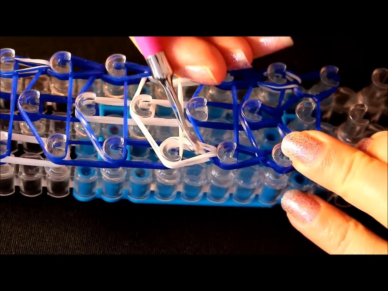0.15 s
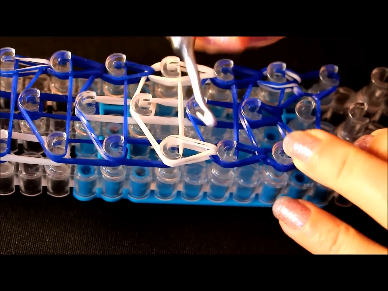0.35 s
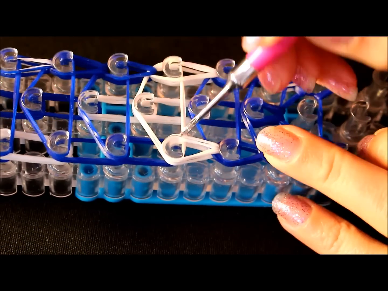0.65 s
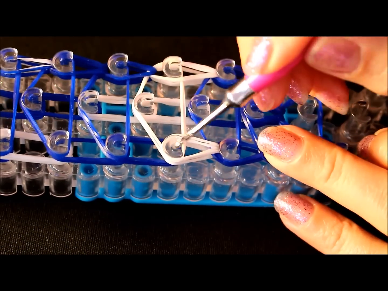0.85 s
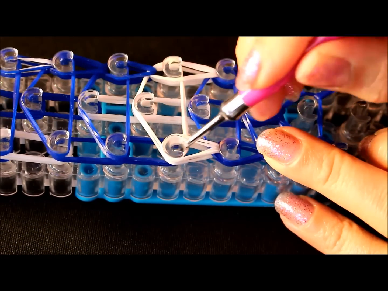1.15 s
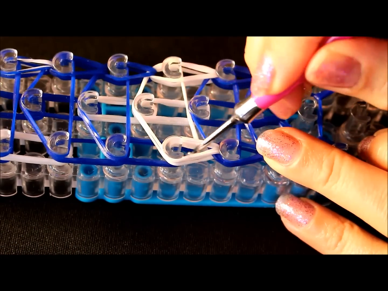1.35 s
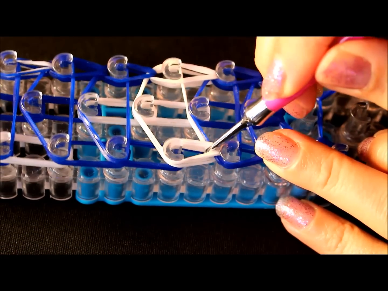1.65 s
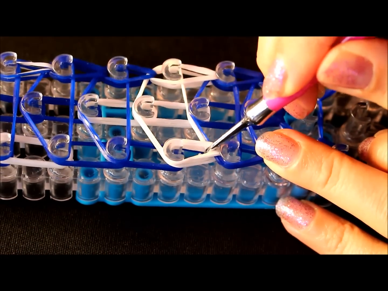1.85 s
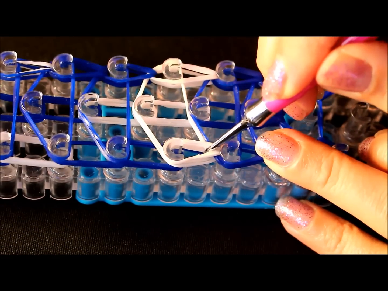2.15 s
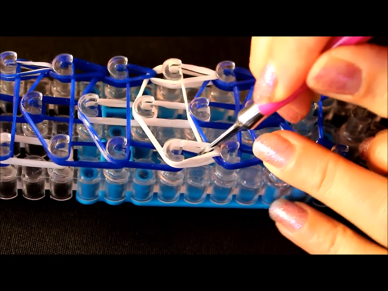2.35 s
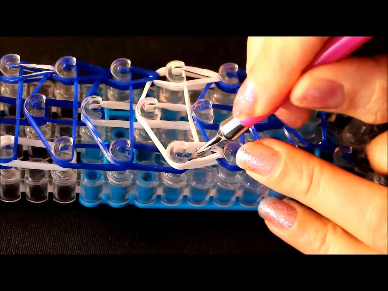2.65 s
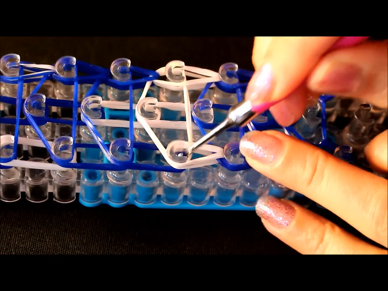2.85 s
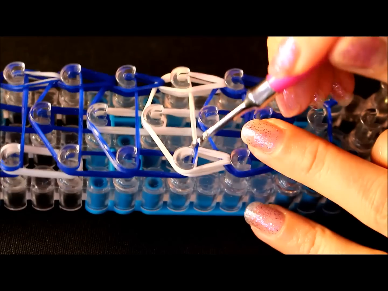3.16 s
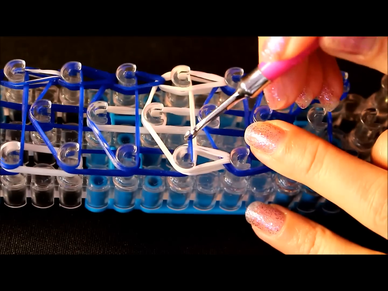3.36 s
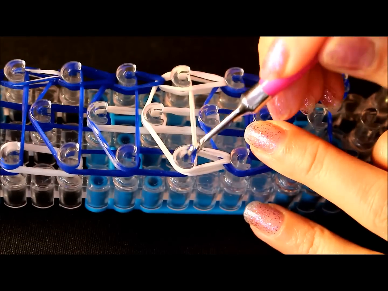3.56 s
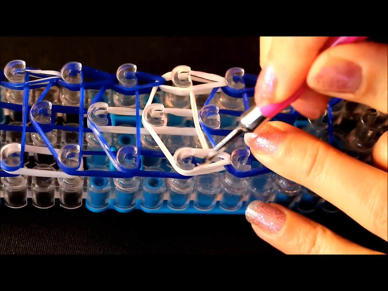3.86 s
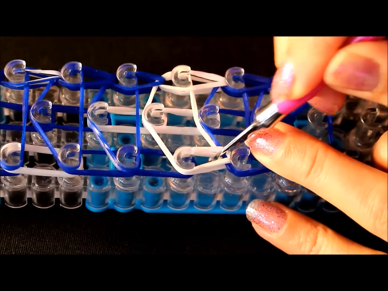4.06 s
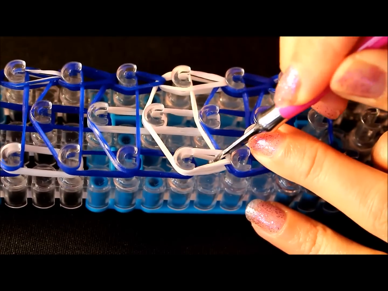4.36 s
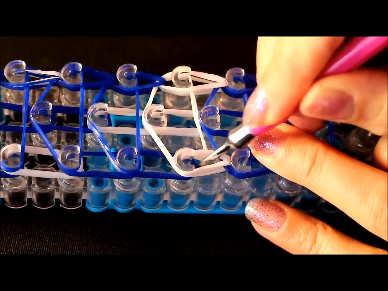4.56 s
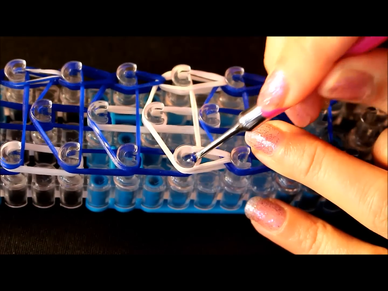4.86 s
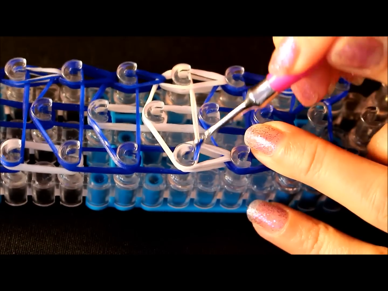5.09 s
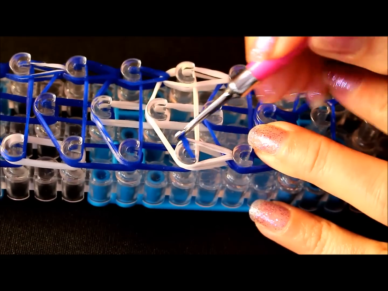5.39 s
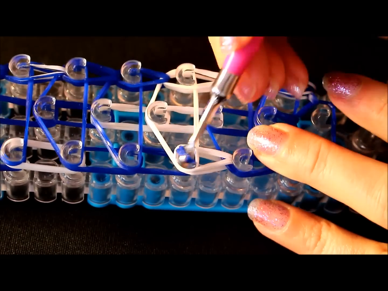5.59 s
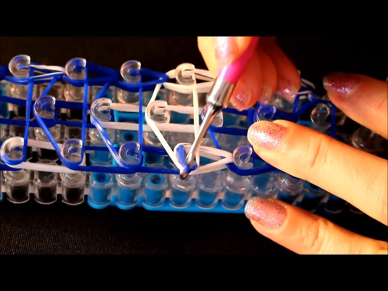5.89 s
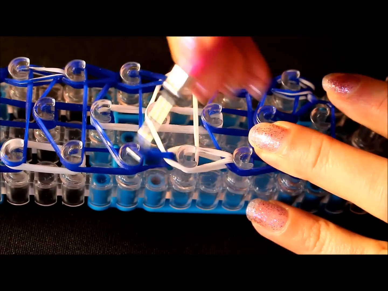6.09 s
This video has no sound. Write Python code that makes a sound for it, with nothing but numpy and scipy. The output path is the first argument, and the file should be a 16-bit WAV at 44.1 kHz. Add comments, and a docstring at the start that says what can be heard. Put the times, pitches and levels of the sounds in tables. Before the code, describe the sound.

Close, irregular taps of a crochet hook on plastic pegs, rubber bands snapping and twanging, ending in a quick run of ticks.

```python
"""Rubber bands on a plastic loom

Close by, a metal crochet hook works rubber bands over pegs; its clicks ring the hollow frame.
Three bands snap loudly, the loom rocks on the table with soft thuds, and rubber twangs and rubs.
At the end a stretched band slips over a peg in a quick run of ticks. A small room hums and hisses."""
import sys
import numpy as np
from scipy import signal
from scipy.fft import rfft, irfft
from scipy.io import wavfile

SR = 44100
rng = np.random.default_rng(int(sys.argv[2]) if len(sys.argv) > 2 else 0)


def int16_out(signal):
    """Quantize to a 16-bit WAV file."""
    q = np.round(np.clip(np.atleast_2d(signal).T, -1, 1) * 32767)
    wavfile.write(sys.argv[1], SR, q.astype(np.int16))


N = 274743


def undb(db):
    """Decibels to gain."""
    return 10 ** (np.asarray(db) / 20)


def seconds(length_s):
    """Time axis."""
    return np.arange(int(length_s * SR)) / SR


def fade(t, t60_s):
    """Free decay, 60 dB down at t60_s."""
    return np.exp(-np.log(1000) * t / t60_s)


def band(x, low_hz, high_hz):
    """Causal band-pass."""
    return signal.sosfilt(signal.butter(2, [low_hz, high_hz], "band", fs=SR, output="sos"), x)


def on_log_axis(hz, points):
    """Interpolate (freq_hz, value) points over log frequency."""
    point_hz, value = np.transpose(points)
    return np.interp(np.log(hz + 1), np.log(point_hz), value)


def add(track, start_s, sound):
    """Mix a sound into a track."""
    i = max(int(start_s * SR), 0)
    track[..., i:i + sound.shape[-1]] += sound[..., :max(N - i, 0)]


# Noise spectrum: freq_hz, relative_density_db
AIR_SPECTRUM = [(20, -7), (35, -5), (70, -1.5), (130, 4.5), (250, -1.5), (450, -4), (800, -7), (1600, -9.5),
                (3500, -11), (6000, -14.5), (10000, -19), (15000, -25)]
# Noise width: freq_hz, left_right_correlation
AIR_CORRELATION = [(60, 0.35), (110, 0.26), (200, -0.11), (400, -0.45), (1200, -0.47), (2400, -0.35),
                   (4400, -0.16), (14000, -0.045)]
# Mains hum: freq_hz, rms_db
HUM_PARTIALS = [(49.5, -68.5), (99, -66), (199, -69)]

def air(mid_rms_db=-58, low_cut_hz=58):
    """Steady room noise and microphone hiss, narrow in the bass and wide in the mids, with mains hum."""
    f = np.arange(N // 2 + 1) * SR / N
    correlation = on_log_axis(f, AIR_CORRELATION)
    low_cut = 1 / np.sqrt(1 + (low_cut_hz / (f + 1)) ** 5)
    spectra = rfft(rng.standard_normal((2, N))) * undb(on_log_axis(f, AIR_SPECTRUM)) * low_cut
    mid = irfft(spectra[0], N)
    side = irfft(spectra[1] * np.sqrt((1 - correlation) / (1 + correlation)), N)
    t = np.arange(N) / SR
    hum = sum(np.sqrt(2) * undb(db) * np.sin(2 * np.pi * (hz * t + rng.random()))
              for hz, db in HUM_PARTIALS)
    return np.array([mid + side, mid - side]) * undb(mid_rms_db) / mid.std() + hum


def room(x, low_t60_s=0.46, mid_t60_s=0.23, high_t60_s=0.3, early_t60_s=0.045, early_db=4, gap_s=0.002):
    """Dense stereo reflections: a quick early cluster, then a tail that darkens."""
    t = seconds(0.6)
    wide = rng.standard_normal((2, len(t)))
    narrow = wide + 0.86 * rng.standard_normal(len(t))  # partly shared by closely spaced microphones
    tail = (band(narrow, 68, 1310) * fade(t, low_t60_s)
            - band(narrow, 2300, 4000) * fade(t, mid_t60_s)
            + band(wide, 3700, 15300) * fade(t, high_t60_s))
    early = undb(early_db) * narrow * fade(t, early_t60_s)
    response = (tail + early) * np.clip(t / gap_s - 1, 0, 1)
    response /= np.sqrt(np.mean(np.sum(response ** 2, axis=1)))
    return signal.fftconvolve(x[None], response, axes=1)[:, :N]


# Near reflections: left_delay_s, right_delay_s, gain_db
NEAR_ECHOES = [(.0024, 0.0042, -18), (0.0128, 0.013, -13), (0.0173, 0.016, -20.5)]

def with_echoes(direct):
    """Direct sound plus its echoes off hands, table and nearby things."""
    out = direct.copy()
    for *delays_s, gain_db in NEAR_ECHOES:
        for ear, delay_s in enumerate(delays_s):
            add(out[ear], delay_s, undb(gain_db) * direct[ear])
    return out


def swing(pitch_hz, t60_s, sharp, settle_s, octave_db, rise_s):
    """A dying vibration that starts slightly sharp while the tension lasts."""
    t = seconds(0.4)
    glide_hz = pitch_hz * (1 + sharp * np.exp(-t / settle_s))
    phase = 2 * np.pi * np.cumsum(glide_hz) / SR
    fundamental = np.sin(phase) * fade(t, t60_s)
    octave = undb(octave_db) * np.sin(2 * phase) * fade(t, t60_s / 2)
    return (fundamental + octave) * (1 - np.exp(-t / rise_s))


# Loom rocking: start_s, pitch_hz, level_db
LOOM_THUDS = [(.699, 145, -47), (1.479, 299, -34.5), (1.655, 193, -43), (1.676, 183, -42),
              (1.706, 133, -39), (1.819, 164, -46.5), (2.789, 188, -40), (3.065, 132, -37),
              (4.458, 285, -43), (4.495, 210, -41), (4.549, 130.6, -39), (4.551, 274, -34)]

def thuds(ref_hz=135, ref_t60_s=0.18, damping_exponent=1.3):
    """The loom rocks on the table as a band pulls or lets go; higher thuds die sooner."""
    out = np.zeros(N)
    for start_s, pitch_hz, level_db in LOOM_THUDS:
        t60_s = ref_t60_s * (ref_hz / pitch_hz) ** damping_exponent
        thud = swing(pitch_hz, t60_s, sharp=0.066, settle_s=0.0033, octave_db=-11.5, rise_s=0.0018)
        add(out, start_s, undb(level_db) * thud)
    return out


# Plucked bands: start_s, pitch_hz, level_db
BAND_TWANGS = [(.641, 427, -50), (1.484, 408.5, -41), (2.513, 626, -40), (4.091, 550, -36)]

def twangs():
    """A released band swings briefly at its own pitch."""
    out = np.zeros(N)
    for start_s, pitch_hz, level_db in BAND_TWANGS:
        twang = swing(pitch_hz, t60_s=0.17, sharp=0.05, settle_s=0.0068, octave_db=-22, rise_s=0.0017)
        add(out, start_s, undb(level_db) * twang)
    return out


FRAME, PLATE, PEG, TIP, TICK = PARTS = range(5)  # row order of the per-part tables
# Range per part: low_hz, high_hz
PART_BANDS = [(110, 430), (620, 1800), (1950, 2900), (2900, 4800), (4800, 16000)]
# Response per part: rise_s, clatter_db, clatter_t60_s, room_send_db, left_minus_right_db
PART_RESPONSES = [(0.0029, -2.5, 0.047, -2.5, -0.5), (0.0017, -4.5, 0.055, -4, 3),
                  (.0011, -5.5, 0.044, -13.5, 1.5), (0.0013, -17.5, 0.047, -13.5, 0),
                  (0.0004, -2.5, .013, -10.5, 0)]
# Loom and hook resonances: freq_hz, level_db, t60_s
LOOM_MODES = [(193, -3.5, 0.089), (245, -7, .04), (280, 8, 0.043), (385, -4, 0.035), (630, -9, .03),
              (933, 0, 0.028), (1047, -0.5, 0.025), (1201, -6.5, 0.039), (1354, -0.5, 0.035),
              (1472, 1.5, 0.031), (1741, -4, 0.036), (1990, -14, 0.013), (2293, 4.5, 0.022),
              (2476, -7.5, 0.013), (2724, -6, 0.027), (3120, 0.5, 0.022), (3397, 3.5, 0.016),
              (3560, 1, 0.016), (3700, 1.5, 0.015), (3970, 8.5, 0.013), (4226, 0.5, 0.017),
              (4540, -0.5, 0.016), (4830, -23, 0.0091), (4798, -3, 0.012), (5160, -2, 0.013),
              (5690, 3, 0.013), (6270, -1, 0.014), (7220, -3, 0.015), (11750, -1, 0.01), (13940, 4, 0.0065)]

def ring(part, plate_hz=1000, tip_hz=3700, top_hz=6200, focus_width=0.081, off_focus_db=-13,
         spread_s=0.000906, push_s=0):
    """One struck part, peak 1: its modes over a quick clatter of many weaker ones."""
    t = seconds(0.2)
    low_hz, high_hz = PART_BANDS[part]
    rise_s, clatter_db, clatter_t60_s, *_ = PART_RESPONSES[part]
    modes = np.zeros(len(t))
    for hz, level_db, t60_s in LOOM_MODES:
        if low_hz <= hz < high_hz:
            # The contact point favours modes near plate_hz and tip_hz.
            focus = sum(np.exp(-(np.log(hz / near) / focus_width) ** 2) for near in (plate_hz, tip_hz))
            gain = (undb(off_focus_db) + focus) * undb(level_db)
            detuned_hz = hz * (1 + 0.008 * rng.standard_normal())
            # Phases roughly align once the blow has spread through the part.
            phase = 2 * np.pi * detuned_hz * (t - spread_s) + 0.53 * rng.standard_normal()
            modes += gain * np.sin(phase) * fade(t, t60_s)
    clatter = band(rng.standard_normal(len(t)), low_hz, high_hz) * fade(t, clatter_t60_s)
    ringing = modes / abs(modes).max() + undb(clatter_db) * clatter / abs(clatter).max()
    attack = 1 - np.exp(-(t / (rise_s + push_s)) ** 2)
    contact_lowpass = signal.butter(3, top_hz, fs=SR, output="sos")
    blow = signal.sosfilt(contact_lowpass, ringing * attack)
    return blow / abs(blow).max()


# Rubber and fingers on the loom: start_s, end_s, level_db, softness_db
RUB_STROKES = [(1.09, 1.148, -67.5, 4), (2.258, 2.446, -72.5, 11), (2.848, 3.007, -71, -7),
               (3.01, 3.078, -62.5, 3.5), (3.701, 3.933, -71.5, 4), (4.44, 4.56, -66.5, 6),
               (4.727, 4.8, -67.5, 5.5), (4.853, 4.946, -69.5, -5.5), (5.235, 5.307, -67, -3),
               (5.38, 5.63, -67, 3), (6.131, 6.176, -53, -3)]
# Mix of frame, plate, tip: share_db, db_per_softness_db
RUB_MIX = [(-0.2, 1.0), (-1, -0.22), (0.1, -1.2)]

def rubs(catches_per_s=420, scatter_db=3):
    """Friction: a swell of tiny uneven catches rings the loom; a soft touch favours the frame."""
    parts = np.zeros((len(PARTS), N))
    for start_s, end_s, level_db, softness_db in RUB_STROKES:
        samples = int((end_s - start_s) * SR)
        caught = rng.random(samples) < catches_per_s / SR
        catches = caught * undb(scatter_db * rng.standard_normal(samples))
        catches *= rng.choice([-1, 1], samples) * signal.windows.tukey(samples, 0.6)
        for part, (share_db, by_softness) in zip((FRAME, PLATE, TIP), RUB_MIX):
            rub = signal.fftconvolve(catches, ring(part, focus_width=0.4))
            rub /= np.sqrt(np.sum(rub ** 2) / samples + 1e-18)
            add(parts[part], start_s, undb(level_db + share_db + softness_db * by_softness) * rub)
    return parts


def jerks(step_s, fall_db_per_s, steps, crest_s=6.1553, crest_db=-22):
    """Even jerks, weaker the further from the crest of the peg: rows of start_s, level_db."""
    return [(crest_s + k * step_s, crest_db - fall_db_per_s * abs(k * step_s)) for k in steps]


# Faint single ticks, some just before a loud snap: start_s, level_db
SINGLE_TICKS = [(1.452, -44), (4.542, -36), (5.9326, -39), (6.0204, -29.5)]
# Mix per part: share_db
TICK_MIX = [-18.5, -18, -17, -2, -11]

def ticks_and_slip(grip_t60_s=0.055, plate_hz=920, tip_hz=3750, wander=0.039):
    """Single ticks, then a stick-slip run: each jerk ticks the peg and the gripping rubber damps it."""
    parts = np.zeros((len(PARTS), N))
    climb = jerks(step_s=-0.0185, fall_db_per_s=85, steps=range(1, 4))
    slide = jerks(step_s=0.017, fall_db_per_s=190, steps=range(5))
    for start_s, level_db in SINGLE_TICKS + climb + slide:
        shift = 1 + wander * rng.standard_normal()
        for part, share_db in enumerate(TICK_MIX):
            tick = ring(part, plate_hz * shift, tip_hz * shift, top_hz=5200, off_focus_db=-12)
            grip = fade(np.arange(len(tick)) / SR, grip_t60_s)
            add(parts[part], start_s, undb(level_db + share_db) * tick * grip)
    return parts


def strike(parts_db, tip_hz, mid_peg_plate_hz=1210, mid_peg_tip_hz=3850, **contact):
    """One blow on all parts; off mid-peg, the favoured plate resonance falls as the tip's rises."""
    plate_hz = mid_peg_plate_hz * (mid_peg_tip_hz / tip_hz) ** 2.5
    return np.array([undb(parts_db[part]) * ring(part, plate_hz, tip_hz, **contact) for part in PARTS])


# Hook on pegs: start_s, level_db, softness_db, side_push_db, tip_hz
HOOK_TAPS = [(0.105, -56.5, -17, 4, 3930), (0.1272, -38.5, -9, 7.5, 3300), (0.234, -46.5, 2, 4, 3580),
             (0.315, -48.5, -3.5, 4, 3500), (0.3667, -48.5, -8.5, -6, 3900), (0.6966, -38, 0, -1.5, 3970),
             (0.791, -46.5, -2.5, 0, 4060), (1.0956, -44.5, -7, -3, 3660), (1.4087, -56.5, -17, 1, 3780),
             (1.6758, -45.0, 8, 6, 3600), (1.7, -44.5, 4.5, 4, 3620), (1.8193, -55.5, 11, 12, 3560),
             (2.292, -56.5, 12.5, -1, 3570), (2.37, -56.0, 14, 9, 3600), (2.513, -46.5, -2, -5, 3480),
             (2.523, -35.5, -2.5, -0.5, 3600), (2.587, -35, 2.5, 3, 4030), (2.615, -37, 1.5, -3, 3540),
             (2.6404, -43.5, 15.5, -10, 4220), (2.785, -39.5, 6, 7.5, 3620), (3.025, -42, 6, -6, 3680),
             (3.23, -45.5, -3, 2.5, 3680), (4.363, -50, 6, -5, 4000), (4.5528, -37.5, 10.5, -9, 3610),
             (4.626, -43.0, 3, -3, 4160), (5.2203, -44.5, -5.5, -6, 3800), (5.26, -43.5, 3.5, -6, 3820),
             (5.5822, -48.5, -9, -1.5, 3660), (5.604, -35.5, -4.5, -9.5, 3700)]
# Mix per part: share_db, db_per_softness_db, db_per_side_push_db
TAP_MIX = [(-9, 1.0, 0.24), (-5, 0.63, -0.37), (-4.7, -0.25, 1.0), (-0.5, -0.87, 0), (-7.5, -0.63, -1.03)]

def taps(lead_s=0.0003):
    """Hard taps ring the hook's tip, rubber-cushioned ones frame and plate, sideways ones the peg."""
    parts = np.zeros((len(PARTS), N))
    share_db, by_softness, by_push = np.transpose(TAP_MIX)
    for start_s, level_db, softness_db, side_push_db, tip_hz in HOOK_TAPS:
        parts_db = level_db + share_db + softness_db * by_softness + side_push_db * by_push
        add(parts, start_s - lead_s, strike(parts_db, tip_hz, top_hz=6300))
    return parts


# Bands snapping onto pegs: start_s, level_db, recoil_db, tip_hz, top_hz
BAND_SNAPS = [(1.4744, -30, 23, 3920, 6800), (4.0887, -24, 14, 3420, 13500),
              (4.5474, -23.5, 2.5, 4200, 6850)]
# Mix per part: share_db, db_per_recoil_db
SNAP_MIX = [(-15, 0), (-0.5, 0), (-5, 0.83), (0, 1.0), (-5, 0.28)]

def snaps(lead_s=0.00017):
    """A band snaps off the hook and rings the loom; the harder the hook recoils, the brighter the crack."""
    parts = np.zeros((len(PARTS), N))
    share_db, by_recoil = np.transpose(SNAP_MIX)
    for start_s, level_db, recoil_db, tip_hz, top_hz in BAND_SNAPS:
        parts_db = level_db + share_db + recoil_db * by_recoil
        crack = strike(parts_db, tip_hz, top_hz=top_hz, off_focus_db=-8.5, spread_s=0.0018,
                       push_s=0.00044)
        add(parts, start_s - lead_s, crack)
    return parts


def scene(room_lean_db=1.1, swing_send_db=-7.5):
    """The loom sits almost straight ahead; nearby surfaces and the room answer it."""
    parts = taps() + snaps() + ticks_and_slip() + rubs()
    swings = thuds() + twangs()
    *_, send_db, pan_db = np.transpose(PART_RESPONSES)
    direct = undb(np.array([pan_db, -pan_db]) / 2) @ parts + swings
    reverb = room(undb(send_db) @ parts + undb(swing_send_db) * swings)
    reverb *= undb([[room_lean_db], [-room_lean_db]])
    return with_echoes(direct) + reverb + air()


def record(dry, cutoff_hz=15800):
    """The recorder's steep low-pass."""
    return signal.sosfilt(signal.ellip(10, 0.2, 70, cutoff_hz, fs=SR, output="sos"), dry)


dry = scene()
out = record(dry)
int16_out(out)
```